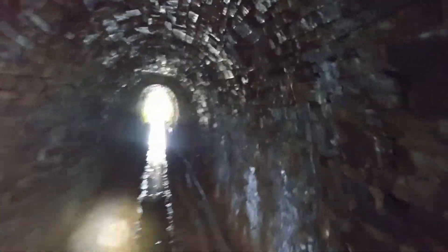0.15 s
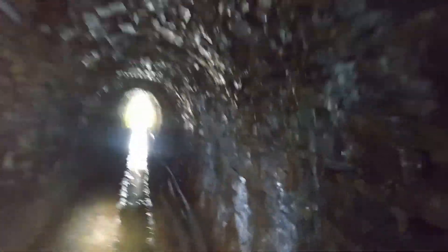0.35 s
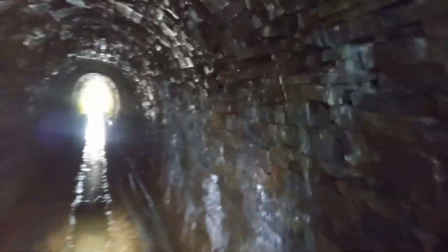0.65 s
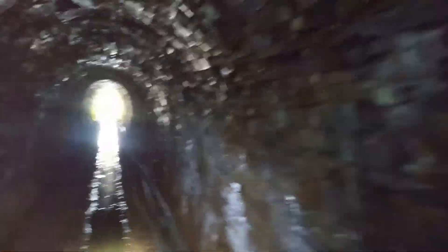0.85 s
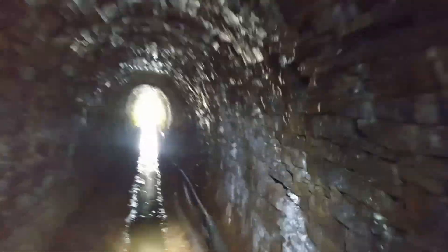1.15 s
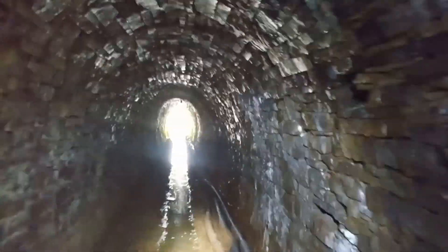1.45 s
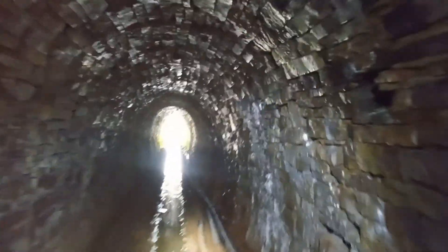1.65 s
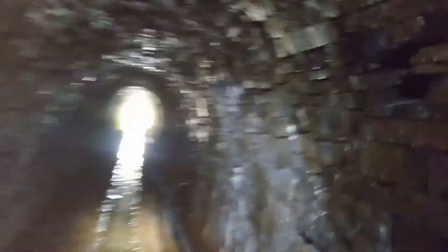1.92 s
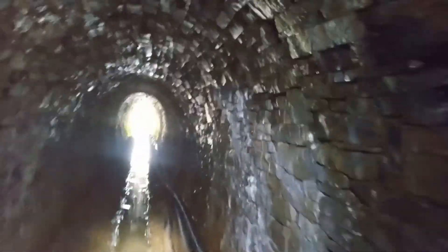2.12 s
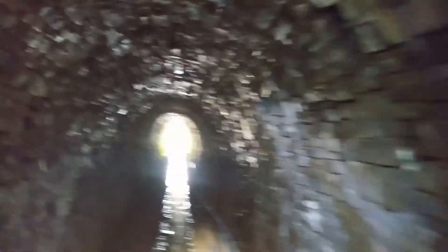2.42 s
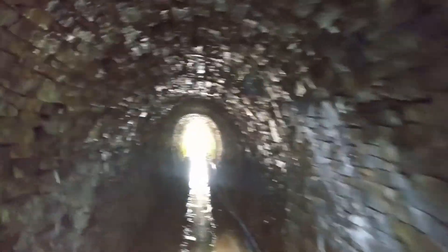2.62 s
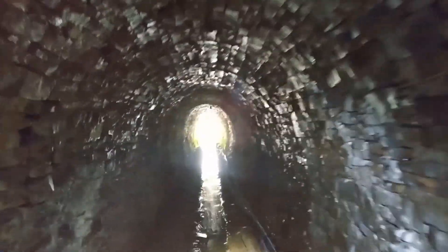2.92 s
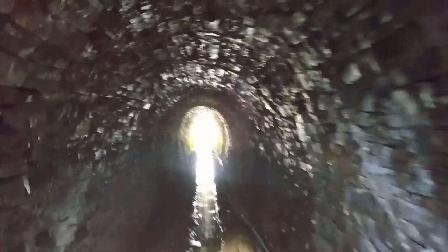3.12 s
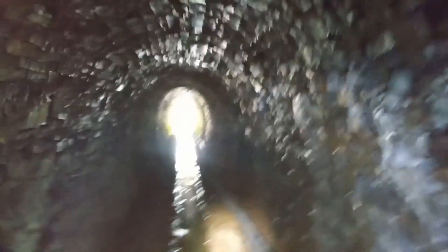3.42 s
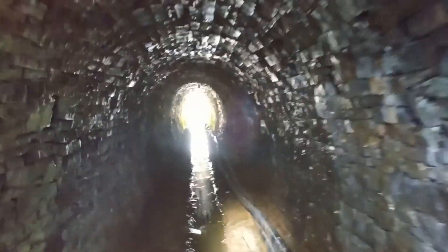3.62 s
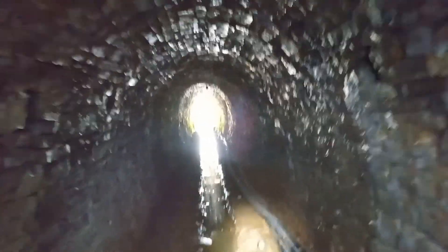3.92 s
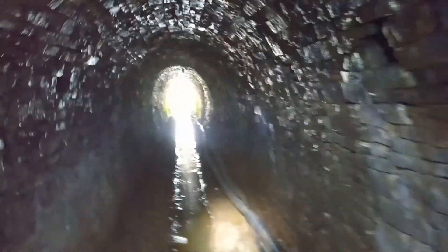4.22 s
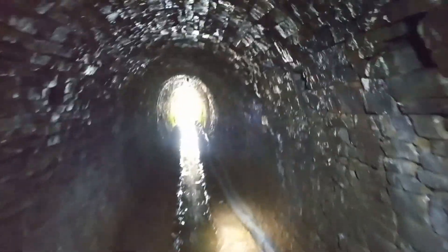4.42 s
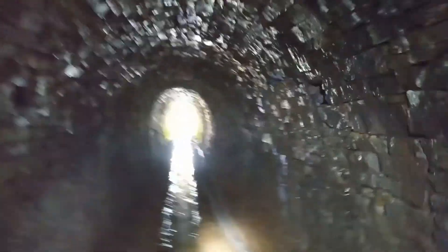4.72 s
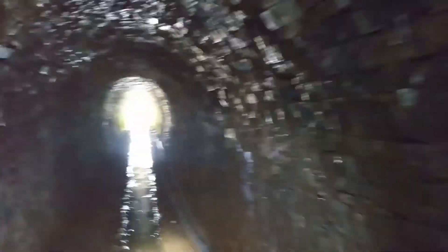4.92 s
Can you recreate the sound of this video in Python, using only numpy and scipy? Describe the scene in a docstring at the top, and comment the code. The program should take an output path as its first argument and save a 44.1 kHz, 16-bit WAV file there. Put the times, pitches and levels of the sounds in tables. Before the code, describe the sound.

Someone wades through shallow water in a narrow stone tunnel, each stride sloshing and splashing with a short, close echo.

```python
"""Someone wades through shallow water in a narrow stone tunnel.
Each stride pushes a sloshing wave and throws water that slaps back as spray and a cloud of small bubbles.
Boots thud softly on the bed, single large bubbles plop, and the water gulps with a gliding pitch.
The arch answers with a short, dense echo and a few low notes, over the faint hiss of still air."""
import sys
import numpy as np
from scipy import signal
from scipy.fft import rfft, irfft, next_fast_len
from scipy.io import wavfile
from scipy.ndimage import map_coordinates

SR = 44100
rng = np.random.default_rng(int(sys.argv[2]) if len(sys.argv) > 2 else 0)


def generate_wav(sig):
    """Save sig (samples, or channels by samples) to the path in sys.argv[1] as 16-bit PCM at SR."""
    pcm = np.round(np.clip(np.atleast_2d(sig).T, -1, 1) * 32767).astype(np.int16)
    wavfile.write(sys.argv[1], SR, pcm)


N = 222836
TIME = np.arange(N) / SR

# Levels in these tables are relative: the functions add their own gains.
# The five pitches in Hz that bound four sizes of drop and bubble: large, middling, small and mist.
SIZE_BORDERS_HZ = [260, 1000, 3000, 7500, 17000]
# Water that dribbles on between strides. Each row: time in seconds, level in dB.
DRIBBLE_LEVELS = [(0, -57.5), (.2, -49.5), (.42, -46), (.6, -52), (.9, -50), (1.36, -45.5), (1.52, -52),
                  (1.9, -47), (2.2, -50.5), (2.5, -54), (3.07, -51), (3.3, -52), (3.57, -57), (3.85, -44),
                  (4.25, -48), (4.52, -52), (4.7, -43), (5.05, -49.5)]
# How the dribble is shared out: one level in dB for each size, from large to mist.
DRIBBLE_SIZES_DB = [-7.5, 1.5, -5, -1]
# A leg pushes a wave. Each row: crest time in seconds, build-up in seconds, slosh in dB, fizz in dB.
LEG_WAVES = [(.23, 0.05, -31.5, -54), (.48, 0.053, -41.5, -56.5), (.88, .03, -35.5, -49),
             (1.001, 0.064, -31, -40), (1.679, 0.038, -27, -41), (2.01, 0.094, -38.5, -47.5),
             (2.38, 0.056, -33.5, -43), (2.58, 0.082, -36, -45), (2.79, 0.15, -47, -53.5),
             (3.19, 0.04, -35.5, -48), (3.39, 0.061, -35.5, -49), (3.69, 0.049, -37.5, -40),
             (3.85, 0.096, -38.5, -51), (4.11, 0.16, -41.5, -50), (4.26, 0.056, -38.5, -54),
             (4.343, 0.029, -27.5, -41.5), (4.851, 0.059, -34.5, -50), (5.05, 0.037, -36, -40)]
# Water slaps down. Each row: start in seconds, decay in seconds, level in dB,
# extra dB for large bubbles driven under, extra dB for fine mist.
SLAPS = [(.082, 0.017, -46, 9.5, -3.5), (0.233, 0.012, -29.5, -15, 2), (.269, 0.0052, -28, -2, 0),
         (.34, 0.0075, -32, 4, 6), (.42, 0.016, -49, 2, -16), (.643, 0.018, -40.5, 0, -0.5),
         (.718, 0.026, -33.5, -16, 3.5), (0.792, .012, -38.5, -5, 2), (0.799, 0.006, -26.5, -5, 5),
         (0.819, 0.036, -36.5, 7, -15), (1.05, 0.027, -29.5, -1.5, 2), (1.149, 0.053, -39, -35, 0.5),
         (1.437, 0.026, -36, 1.5, 4), (1.547, 0.028, -31, -5.5, 1), (1.724, 0.002, -30.5, 8.5, -1),
         (1.798, 0.004, -24.5, -11, -4.5), (1.821, 0.0099, -33.5, -5, 5), (1.879, 0.033, -37, -18, -1),
         (1.941, 0.0071, -40, 10.5, 2), (2.01, 0.027, -38.5, 2.5, -1), (2.109, 0.034, -42.5, -1, 0.5),
         (2.257, 0.032, -33, -6, 0), (2.28, 0.011, -31.5, -7, -3), (2.362, 0.029, -39, -13, -10),
         (2.42, 0.028, -40.5, -15, 2), (2.488, 0.029, -31, -4, 2), (2.672, 0.074, -42, -7, -0.5),
         (2.747, .026, -31.5, -2, 1), (2.943, 0.036, -37.5, 0.5, 6), (3.103, 0.006, -26, -21, -7),
         (3.147, 0.0023, -34, 12, 4), (3.155, 0.0053, -25, -22, -8), (3.2, 0.022, -36.5, 4, 10.5),
         (3.223, 0.045, -38.5, -4, -1), (3.317, 0.029, -50.5, 26, 7), (3.399, 0.012, -36.5, -4, -1.5),
         (3.704, 0.021, -28, -10, 1), (3.934, 0.018, -33, 0.5, 5.5), (3.96, 0.035, -36, -15, 3.5),
         (4.001, 0.01, -27.5, -8, -19), (4.055, 0.0066, -39, 12, -10), (4.128, 0.01, -28, -6, 2),
         (4.441, 0.013, -29.5, -1, 0), (4.474, .017, -35, -8, -6), (4.56, 0.022, -34.5, -11, -4.5),
         (4.6, 0.013, -40.5, 14.5, -1), (4.669, 0.026, -36.5, 7.5, 7), (4.725, 0.008, -31, 7, -9),
         (4.805, 0.019, -28.5, -3, -1)]
# A fixed tone laid over the spray and bubbles. Each row: frequency in Hz, level in dB.
SPRAY_BUBBLE_TONE = [(24, -56), (40, -36), (123, -8), (162, -20), (319, -11), (453, -16.5), (643, -8), (1060, -8),
                     (2540, 1), (4760, -2.5), (6580, -0.5), (8040, -11.5), (9820, -7.5), (14700, -18),
                     (15800, -16.5)]
# How long the tunnel echoes. Each row: frequency in Hz, seconds to fade by 60 dB.
ECHO_FADE_TIMES = [(100, 0.09), (300, 0.26), (700, 0.13), (1800, 0.15), (4600, 0.19), (12000, 0.2)]
# The arch favours pitches that fit between its walls. Each row: frequency in Hz, echo level in dB.
ECHO_TONE = [(60, 7), (131, 2), (165, -16), (239, 3), (275, 4.5), (330, 0), (430, 8), (600, 6),
             (16000, 2.5)]
# Notes that ring on between the walls. Each row: pitch in Hz, seconds to fade by 60 dB, level in dB.
ARCH_NOTES = [(132, 0.26, -32.5), (237.7, 0.2, -32.5), (316.7, 0.4, -37.5), (347, 0.2, -29)]
# The tone of the tunnel's still air. Each row: frequency in Hz, level in dB.
AIR_TONE = [(30, 7), (120, 0.5), (330, -4), (1000, 10.5), (6000, -17), (16000, 1)]
# Boots push down to the bed. Each row: start in seconds, level in dB, pitch in Hz.
BOOT_STEPS = [(0.066, -61, 98), (0.834, -55.5, 204), (0.863, -63, 127), (0.902, -59, 201), (1.211, -70, 85),
              (1.653, -53, 130), (2.194, -63.5, 86), (2.631, -62, 78), (3.187, -67, 173),
              (3.387, -51.5, 180), (4.085, -63, 81), (4.347, -52, 117), (4.719, -58, 195)]
# Single pockets of air that ring. Each row: start in seconds, pitch in Hz, level in dB.
AIR_POCKETS = [(0.085, 1130, -40.5), (.142, 533, -37), (.188, 564, -29), (0.273, 2850, -41),
               (.293, 965, -33), (0.438, 2970, -29), (0.511, 2250, -40), (0.805, 2450, -30),
               (.887, 2000, -27), (.997, 2000, -24), (1.054, 6550, -15.5), (1.129, 694, -31.5),
               (1.189, 1650, -31.5), (1.213, 1665, -21), (1.319, 1360, -38.5), (1.624, 2220, -26.5),
               (1.7993, 3870, -15), (1.944, 614, -32), (2.298, 2170, -24), (2.495, 4370, -22.5),
               (2.499, 370, -30.5), (2.689, 1890, -31), (3.043, 2340, -37), (3.105, 3070, -27.5),
               (3.1498, 9300, -16), (3.158, 4260, -19.5), (3.266, 2700, -29), (3.267, 1270, -33),
               (3.287, 1460, -33), (3.348, 3300, -27.5), (3.389, 312, -25.5), (3.492, 1460, -39),
               (3.938, 1976, -18.5), (3.962, 2580, -24), (3.968, 1380, -27), (4.084, 2250, -32),
               (4.054, 840, -31), (4.116, 1990, -30), (4.143, 318, -29), (4.564, 3120, -25.5),
               (4.608, 2490, -17), (4.611, 1850, -21), (4.697, 1070, -27), (4.71, 3620, -23.5),
               (4.8124, 4100, -19), (4.813, 2540, -23), (4.849, 1200, -29), (4.936, 1470, -32)]
# Gliding gulps of water, and a few low, nearly steady notes of the tunnel ringing.
# Each row: start in seconds, length in seconds, first pitch in Hz, last pitch in Hz, level in dB.
GULPS_AND_NOTES = [(0.852, 0.039, 1510, 2300, -56), (1.93, 0.044, 610, 388, -48.5),
                   (1.987, 0.048, 1986, 3280, -45), (1.998, 0.055, 5300, 8150, -42.5),
                   (2.025, 0.091, 300, 329, -60), (2.111, .037, 2200, 2367, -43),
                   (2.206, 0.11, 553, 400, -56), (2.209, 0.059, 1318, 1400, -52),
                   (2.541, 0.18, 401.6, 231, -60), (2.755, .14, 318, 197, -63.5),
                   (3.147, 0.086, 389, 306, -52.5), (3.307, .047, 854, 417, -49.5),
                   (3.431, 0.16, 346, 337, -59), (3.718, .11, 425, 308, -56.5),
                   (4.088, .11, 300.6, 330, -55), (4.606, .018, 1495, 2330, -39),
                   (4.815, 0.062, 928, 1657, -42.5)]


def amp(db):
    """Turns decibels into a number to multiply by."""
    return 10 ** (np.asarray(db) / 20)


def unit(x):
    """Scales a signal to an average power of 1."""
    return x / np.sqrt(np.mean(x ** 2) + 1e-20)


def look_up(table, hz):
    """Reads between the rows of a frequency table, with octaves evenly spaced."""
    row_hz, values = np.transpose(table)
    return np.interp(np.log(hz + 1), np.log(row_hz + 1), values)


def add(mix, start_s, sound):
    """Adds a sound to the mix at its start time."""
    part = mix[..., max(round(start_s * SR), 0):][..., :sound.shape[-1]]
    part += sound[..., :part.shape[-1]]


def colour(x, tone):
    """Turns frequencies up or down to follow a tone table."""
    size = next_fast_len(N + 4096)
    gains = unit(amp(look_up(tone, np.fft.rfftfreq(size, 1 / SR))))
    return irfft(rfft(x, size) * gains, size)[:N]


def clicks(per_s, spread_db):
    """Clicks at random times, uneven in size, some pushing up and some down."""
    hits = np.flatnonzero(rng.random(N) < per_s / SR)
    sizes = amp(spread_db * np.clip(rng.standard_normal(N)[hits], -2, 2))
    out = np.zeros(N)
    out[hits] = np.sign(hits % 2 - .5) * sizes
    return unit(out)


def stirring(wading_db, splash_db, mist_db):
    """How hard dribble, legs and slaps stir the water: one curve for each size of drop and bubble."""
    dribble_db = np.interp(TIME, *np.transpose(DRIBBLE_LEVELS))
    power = amp(dribble_db + np.array(DRIBBLE_SIZES_DB)[:, None] + wading_db) ** 2
    for crest_s, build_s, slosh, fizz in LEG_WAVES:
        wave = np.exp(-.5 * ((TIME - crest_s) / build_s) ** 2)  # settles as fast as it builds
        gurgle = (slosh + fizz) / 2 - 3.5
        sizes_db = np.array([slosh, gurgle, fizz, fizz + mist_db])
        power += np.outer(amp(sizes_db + wading_db), wave) ** 2
    t = TIME[:SR // 4]
    for start_s, decay_s, db, depth, mist in SLAPS:
        rise_s = 0.0034 + 0.056 * decay_s
        slap = np.minimum(t / rise_s, 1) * np.exp(-np.maximum(t - rise_s, 0) / decay_s)
        gurgle = 1.5 + 0.43 * depth
        sizes_db = np.array([depth, gurgle, 0, mist])
        add(power, start_s, np.outer(amp(db + splash_db + sizes_db), slap) ** 2)
    return np.sqrt(power)


def spray(stir, size_db, drops_per_s, spread_db):
    """Drops tick on the surface; the finer they are, the more there are and the higher they sound."""
    out = np.zeros(N)
    for k, strength in enumerate(stir):
        band = signal.butter(3, SIZE_BORDERS_HZ[k:k + 2], "band", fs=SR, output="sos")
        ticks = strength * clicks(drops_per_s[k], spread_db)
        out += amp(size_db[k]) * signal.sosfilt(band, ticks)
    return out


def bubble(hz, decay_s, glide, attack_cycles):
    """A pocket of air rings and dies away; its pitch climbs as it nears the surface."""
    t = np.arange(int(7 * decay_s * SR) + 2) / SR
    turns = hz * (t + glide * t ** 2 / (2 * decay_s))
    fade_in = 1 - np.exp(-turns / attack_cycles)
    return np.sin(2 * np.pi * turns) * fade_in * np.exp(-t / decay_s)


def bubble_cloud(stir, size_db, per_s_at_1khz, cycles_at_1khz, large_hz, trap_db, count=90):
    """Bubbles of many sizes form at random; small ones are more common and ring for more cycles."""
    pitches = np.geomspace(270, 15000, count)
    step = np.log(pitches[1] / pitches[0])
    centres = np.log(SIZE_BORDERS_HZ[1:]) / 2 + np.log(SIZE_BORDERS_HZ[:-1]) / 2
    stir_db = 20 * np.log10(stir) + np.array(size_db)[:, None]
    out = np.zeros(N)
    for hz in pitches * np.exp(step * rng.uniform(-0.45, 0.6, count)):
        khz = hz / 1000
        births = clicks(per_s_at_1khz * khz ** .4, spread_db=5.5)
        at = np.flatnonzero(births)
        # each bubble takes its level from the stirring at its own size and moment
        size = np.interp(np.log(hz), centres, np.arange(len(centres)))
        db = map_coordinates(stir_db, [np.full(len(at), size), at], order=1, mode="nearest")
        # gently stirred water cannot trap the largest pockets of air
        db -= max(np.log(large_hz / hz), 0) * np.maximum(trap_db - db, 0)
        births[at] *= amp(db)
        decay_s = cycles_at_1khz * khz ** 0.7 / hz
        ring = bubble(hz, decay_s, glide=0.048, attack_cycles=0.42)
        share = hz * step / (SR / 2)  # the part of the frequency range that this size fills
        out += signal.oaconvolve(births, ring * np.sqrt(share / np.sum(ring ** 2)))[:N]
    return out


def wall_echo(build_s, far_db, far_fade_s):
    """The echo of one click: close stone walls answer at once, and a faint tail lingers down the tunnel."""
    hz, frame_s, noise = signal.stft(rng.choice([-1., 1.], SR), SR, nperseg=512)
    near = amp(-60 * frame_s / look_up(ECHO_FADE_TIMES, hz)[:, None])
    far = amp(far_db - 60 * frame_s / far_fade_s)
    tail = signal.istft(noise * (near + far), SR, nperseg=512)[1][:SR]
    tail *= 1 - np.exp(-(TIME[:SR] / build_s) ** 2)
    return tail / np.linalg.norm(tail)


def tunnel_echo(water, level_db, spots_per_s, count=12):
    """Water lands in a new spot from moment to moment, and each spot has its own echo."""
    spot = TIME * spots_per_s
    out = np.zeros(N)
    for k in range(count):
        distance = abs((spot - k + count / 2) % count - count / 2)  # the spots take turns in a loop
        share = np.cos(np.pi / 2 * np.minimum(distance, 1))
        echo = wall_echo(build_s=0.0016, far_db=-59, far_fade_s=0.81)
        out += signal.fftconvolve(water * share, echo)[:N]
    return amp(level_db) * colour(out, ECHO_TONE)


def arch_ring(water):
    """The water wakes low, hollow notes between the walls."""
    t, ring = TIME[:SR], np.zeros(SR)
    for hz, fade_s, db in ARCH_NOTES:
        note = np.sin(2 * np.pi * hz * t) * amp(-60 * t / fade_s)
        ring += amp(db) * note / np.linalg.norm(note)
    return signal.fftconvolve(water, ring)[:N]


def still_air(level_db):
    """The air in the tunnel makes a faint, steady hiss."""
    return amp(level_db) * colour(rng.standard_normal(N), AIR_TONE)


def boot_thuds(level_db, cycles_to_peak, rumble_db, rumble_s):
    """A boot shoves water against the bed: a low push of a cycle or two, with a brief rumble."""
    out, t = np.zeros(N), TIME[:SR // 6]
    low_band = signal.butter(2, [55, 280], "band", fs=SR, output="sos")
    for start_s, db, hz in BOOT_STEPS:
        progress = t * hz / cycles_to_peak
        push = progress * np.exp(1 - progress) * np.sin(2 * np.pi * hz * t)
        churn = unit(signal.sosfilt(low_band, rng.standard_normal(len(t))))
        rumble = churn * t / rumble_s * np.exp(1 - t / rumble_s)
        add(out, start_s, amp(db + level_db) * (push + amp(rumble_db) * rumble))
    return out


def plops(level_db, longest_decay_s, half_decay_hz):
    """Single bubbles pinch off as the hole left by a splash closes; smaller ones die sooner."""
    out = np.zeros(N)
    for start_s, hz, db in AIR_POCKETS:
        decay_s = longest_decay_s / (1 + (hz / half_decay_hz) ** 2)
        add(out, start_s, amp(db + level_db) * bubble(hz, decay_s, glide=0.028, attack_cycles=0.76))
    return out


def gulps_and_notes(level_db, base_width_hz, sharpness):
    """Gulps of water glide up or down, and the tunnel rings with a few low, nearly steady notes."""
    out = np.zeros(N)
    for start_s, length_s, first_hz, last_hz, db in GULPS_AND_NOTES:
        hz = np.geomspace(first_hz, last_hz, int(length_s * SR))
        noise = rng.standard_normal(SR // 2) + 1j * rng.standard_normal(SR // 2)
        # smoothed noise makes the note waver
        smooth = np.exp(-np.pi * (base_width_hz + first_hz / sharpness) / SR)
        waver = signal.lfilter([1], [1, -2 * smooth, smooth ** 2], noise)[-len(hz):]
        ring = (waver * np.exp(2j * np.pi * np.cumsum(hz) / SR)).real
        fade = signal.windows.tukey(len(hz), .6)
        add(out, start_s, amp(db + level_db) * unit(ring * fade))
    return out


def scene():
    """Spray, bubbles and boots sound in the tunnel, over its still air."""
    stir = stirring(wading_db=-3.5, splash_db=-1, mist_db=3.5)
    drops = spray(stir, size_db=[-12.5, -11, -3, -1], drops_per_s=[400, 700, 2000, 10000], spread_db=2)
    cloud = bubble_cloud(stir, size_db=[-1, -0.96, -2, -2], per_s_at_1khz=36, cycles_at_1khz=3.32,
                         large_hz=724, trap_db=-41)
    water = colour(drops + cloud, SPRAY_BUBBLE_TONE)
    water += plops(level_db=-2, longest_decay_s=0.0031, half_decay_hz=4260)
    water += gulps_and_notes(level_db=-6.5, base_width_hz=63, sharpness=12)
    water += boot_thuds(level_db=0.5, cycles_to_peak=0.65, rumble_db=-12, rumble_s=0.01)
    air = still_air(level_db=-68)
    echo = tunnel_echo(water, level_db=-2, spots_per_s=130)
    return (water + echo + arch_ring(water) + air)[None]


def record(dry):
    """The microphone loses the deep bass, and the very highest treble is cut off."""
    bass_cut = signal.butter(2, 55, "high", fs=SR, output="sos")
    treble_cut = signal.firwin(511, 16000, window=("kaiser", 9), fs=SR)
    return signal.oaconvolve(signal.sosfilt(bass_cut, dry), treble_cut[None], "same")


dry = scene()
out = record(dry)
generate_wav(out)
```